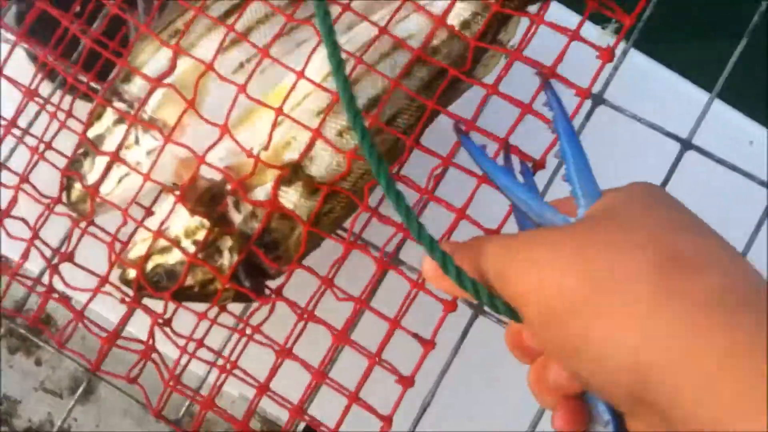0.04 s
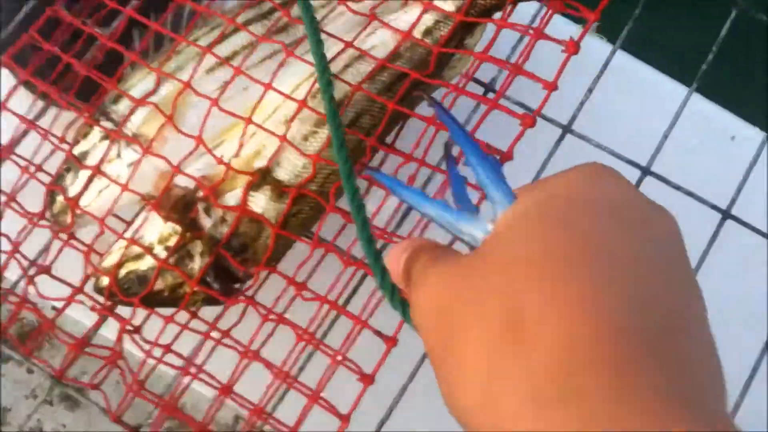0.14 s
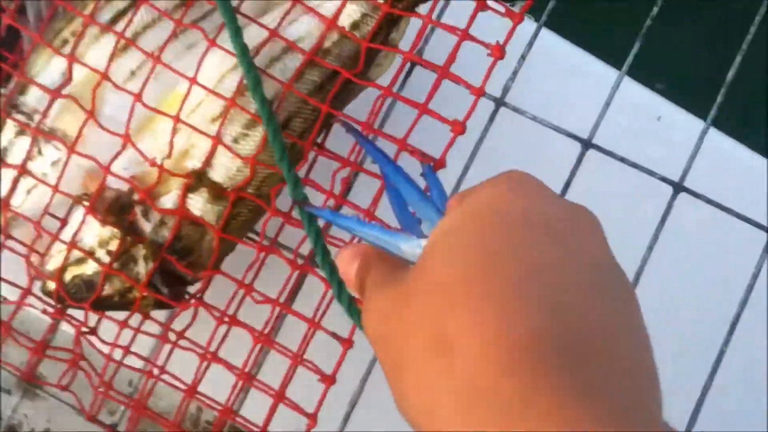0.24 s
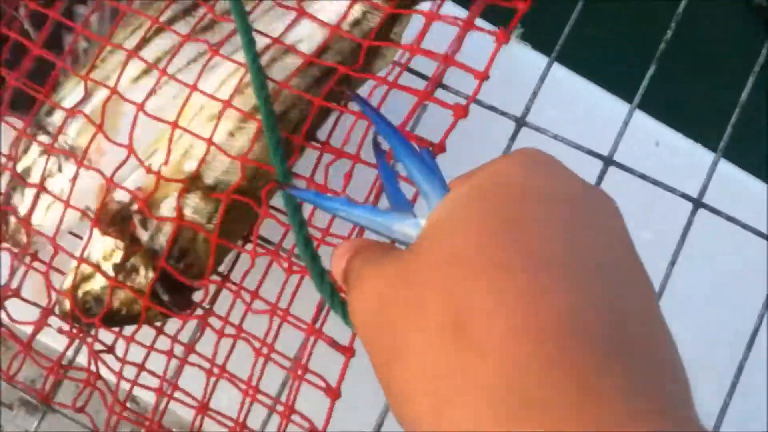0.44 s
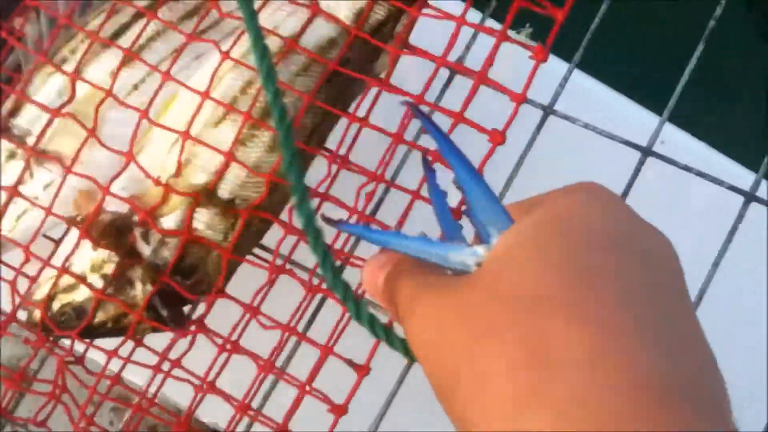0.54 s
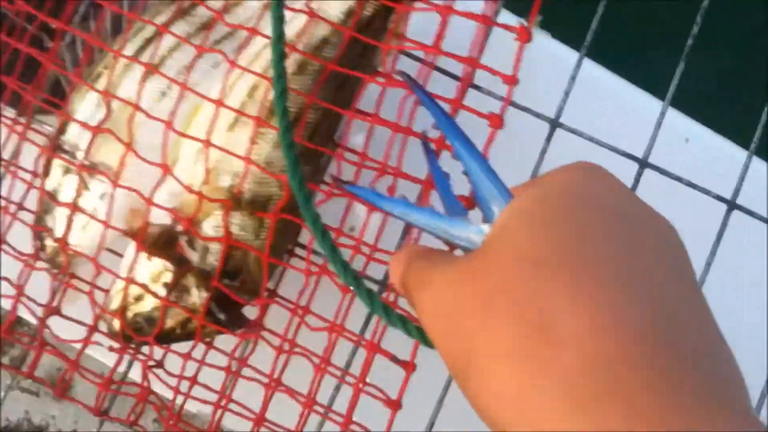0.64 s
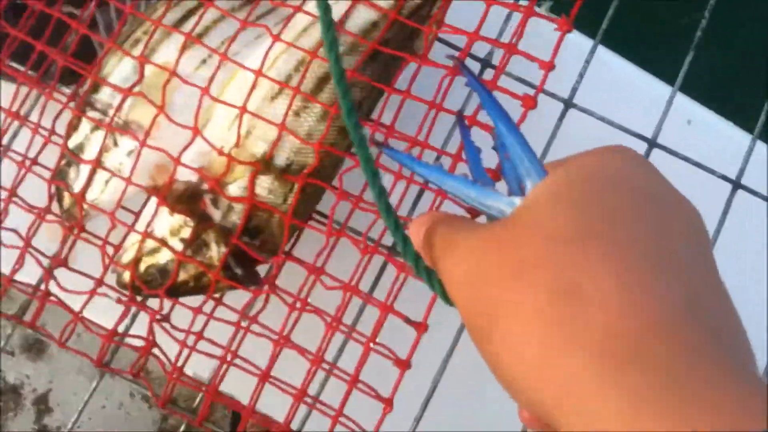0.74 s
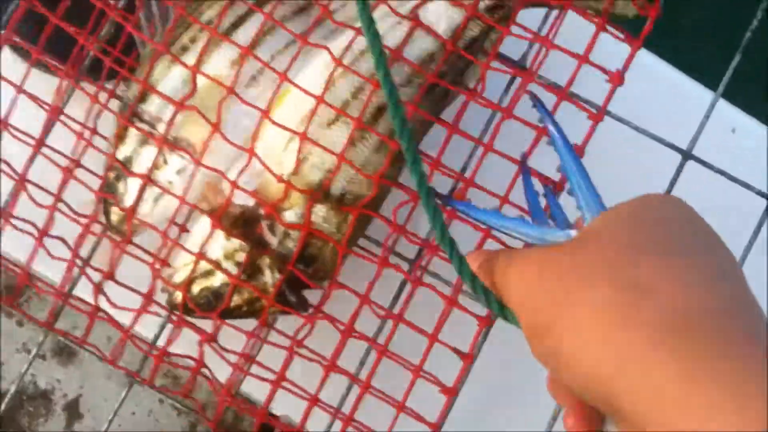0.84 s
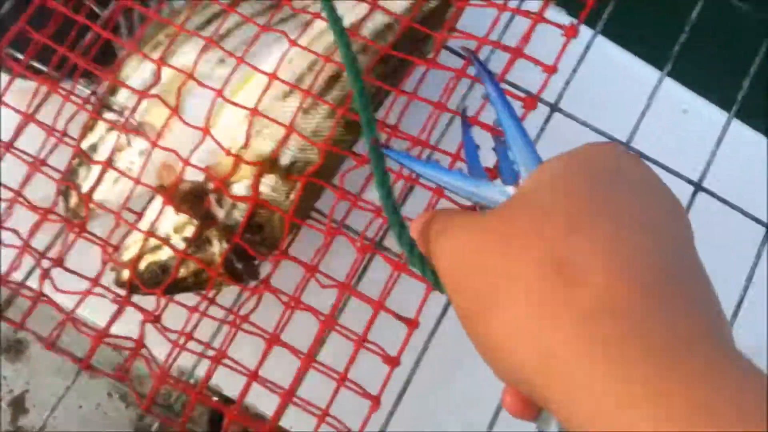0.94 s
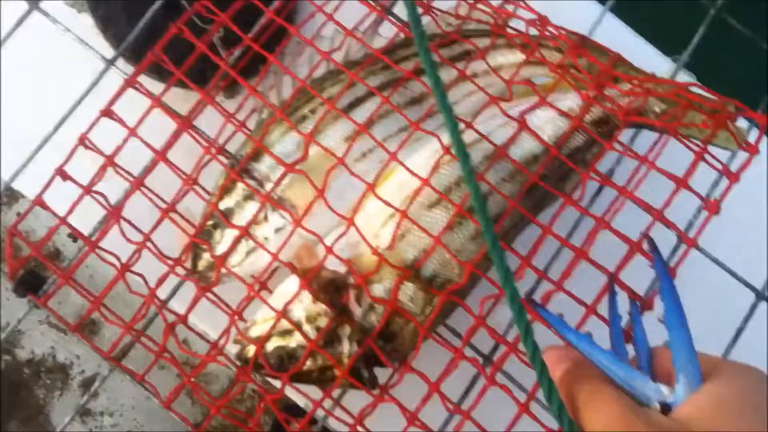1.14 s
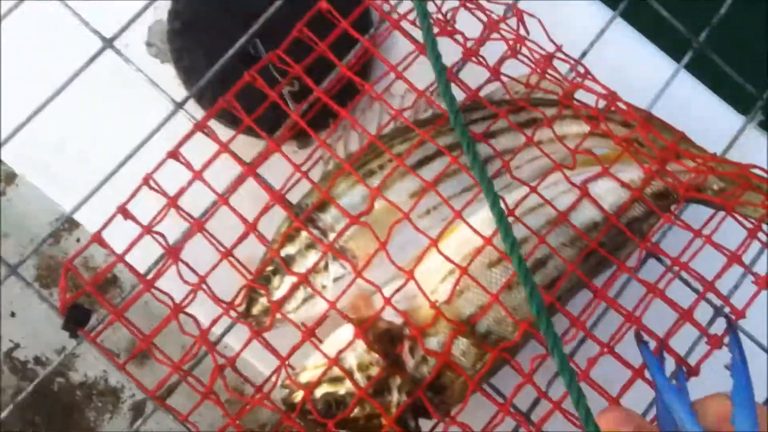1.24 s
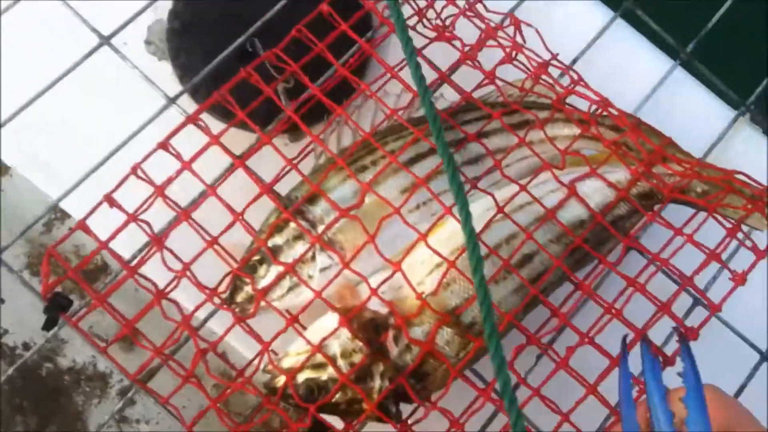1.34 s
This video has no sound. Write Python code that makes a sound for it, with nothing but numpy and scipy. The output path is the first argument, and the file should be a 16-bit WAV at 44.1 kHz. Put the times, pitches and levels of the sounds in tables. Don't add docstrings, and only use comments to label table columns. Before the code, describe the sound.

A crab trap's wires rattle under hard claw and shell knocks, quiet at first, then a dense bright burst, thinning into separate clacks. Hollow deck thumps and faint water wash sit below, heard close on a phone.

```python
import sys
import numpy as np
from scipy import signal
from scipy.fft import rfft, irfft
from scipy.io import wavfile
from scipy.ndimage import uniform_filter1d

SR = 44100
rng = np.random.default_rng(int(sys.argv[2]) if len(sys.argv) > 2 else 0)


def boost_factor(decibels):
    exponent = np.asarray(decibels, float) / 20
    return 10 ** exponent


def pcm_store(signal):
    levels = np.round(np.clip(np.atleast_2d(signal), -1, 1) * 32767)
    wavfile.write(sys.argv[1], SR, levels.astype(np.int16).T)


N = 61739
LENGTH = 12288


def unit(x):
    return x / np.max(np.abs(x))


def colour(x, points, tilt_db=0.):
    octave = np.log2(np.maximum(np.arange(1025) * SR / 2048, 20))
    p = np.array(points, float)
    db = np.interp(octave, np.log2(p[:, 0]), p[:, 1])
    db = db + tilt_db * (np.maximum(octave, np.log2(1300)) - np.log2(3500))
    cepstrum = irfft(db * np.log(10) / 20)
    cepstrum[1:1024] *= 2
    cepstrum[1025:] = 0
    response = irfft(np.exp(rfft(cepstrum)))
    return signal.fftconvolve(x, response)[:len(x)]


def above(x, hz):
    return signal.sosfiltfilt(signal.butter(6, hz, "high", fs=SR, output="sos"), x)


def ring(x, modes, chance, stretch=0.87):
    scatter_db, detune = 2, 0.016
    t = np.arange(LENGTH // 2) / SR
    response = np.zeros(len(t))
    for (hz, db, t60), a, b in zip(modes, chance[::2], chance[1::2]):
        decay = boost_factor(db + scatter_db * a - 60 * t / (t60 * stretch))
        response += decay * np.sin(2 * np.pi * hz * (1 + detune * b) * t)
    return signal.fftconvolve(x, response * np.linspace(1, 0, num=len(t)))[:LENGTH]


def add(out, s, x):
    i = int(round(s * SR))
    a, b = max(-i, 0), min(len(x), N - i)
    faded = x * np.minimum(np.linspace(3, 0, num=len(x)), 1)
    out[i + a:i + b] += faded[a:b]


def grains():
    grain_db, clump_db = 2.5, 1.6
    clumps = uniform_filter1d(np.repeat(rng.standard_normal(LENGTH // 128), 128), size=64)
    size_db = grain_db * rng.exponential(size=LENGTH) + clump_db * clumps
    return rng.standard_normal(LENGTH) * boost_factor(size_db)


def rattle(db, tilt_db, t60, hz, hold=0.):
    # hz, level_db
    frame_colour = [(240, -38.5), (360, -5), (620, -14.5), (1140, -10), (1710, -13), (1870, -5.5),
                    (5190, 1), (5600, -1.5), (16000, -24.5)]
    # pitch_hz, level_db, t60_s
    wire_modes = [(1413, -21.5, 0.2), (1907, -3, 0.082), (2105, -2.5, 0.051), (2830, -29, 0.13),
                  (3080, -11.5, 0.15), (3640, -31, 0.022), (3600, 1.5, 0.039), (4250, -7.5, 0.0056),
                  (4240, -11.5, 0.011), (5100, -3, 0.0072), (5980, -18, 0.033), (6630, 0, 0.0063)]
    strike_db, ring_db, patchy_db = 4.5, -9.5, 3.5
    t = np.arange(LENGTH) / SR
    attack_s = 0.00044 * boost_factor(-2.2 * min(db + 29, 0))
    late = np.maximum(t - hold, 0)
    shake = grains() * boost_factor(-60 * late / max(t60, .02))
    if hold == 0:
        shake = shake * (1 + boost_factor(strike_db) * np.exp(-t / 0.0018))
    shake = shake * np.minimum(t / attack_s, 1)
    shake = colour(shake, [(hz / 1.146, 0), (hz, 5), (hz * 1.255, 0)])

    dull = signal.sosfilt(signal.butter(2, 5150, fs=SR, output="sos"), shake)
    fade = boost_factor(-60 * t / .17)
    clatter = colour(fade * shake + (1 - fade) * dull, frame_colour, tilt_db)
    patches = np.c_[np.linspace(500, 16000, num=80), patchy_db * rng.standard_normal(80)]
    clatter = colour(clatter, patches)

    struck_modes = wire_modes + [(hz, -1.5, .045)]
    rung = ring(shake, struck_modes, rng.standard_normal(28))
    rung = colour(rung, [(400, 0.0073), (800, 0)], 0.56 * tilt_db)
    return boost_factor(db) * unit(unit(clatter) + boost_factor(ring_db) * unit(rung))


def wires():
    # start_s, peak_db, brightness_db_per_octave, rattle_t60_s, pitch_hz
    earlier_knock = (-.02, -26.5, -2.5, 0.24, 3021)
    # start_s, peak_db, brightness_db_per_octave, rattle_t60_s, pitch_hz
    knocks = [(.148, -38.5, -10.5, 0.4, 2570), (.195, -36.5, -27, 0.61, 904), (.222, -22, -7, 0.14, 3600),
              (.3586, -22, -4.5, 0.13, 3600), (.374, -20, -6, 0.15, 3510), (.4252, -16.5, 4, 0.11, 2970),
              (.4565, -9, -3, 0.13, 5190), (.5315, -27.5, -8, 0.14, 1770), (.565, -18, -3, .13, 3600),
              (.601, -19.5, -3.5, 0.32, 4210), (.632, -24, -7, 0.071, 5000),
              (.649, -23.5, -0.5, 0.095, 4820), (.672, -20, -8, 0.17, 2320),
              (.7317, -30.5, -8.5, 0.67, 4040), (.793, -23, -6, 0.13, 3740), (.885, -14, 2.5, 0.12, 3590),
              (.92, -23.5, -7.5, 0.31, 1516), (1.0445, -15, -3, 0.18, 3060),
              (1.046, -27.5, -12, 0.27, 1110), (1.134, -32, -0.5, 0.24, 3380),
              (1.2215, -30.5, -5, 0.34, 2864)]
    # start_s, peak_db, brightness_db_per_octave, pitch_hz, length_s
    drags = [
        (0.124, -42, -1, 4250, 0.069),
        (0.4252, -11.5, 0.6, 4620, 0.025),
        (0.89, -19, 0, 3830, 0.029),
    ]
    out = np.zeros(N)
    for s, db, tilt_db, t60, hz in [earlier_knock] + list(knocks):
        add(out, s, rattle(db, tilt_db, t60, hz))
    for s, db, tilt_db, hz, length in drags:
        add(out, s, rattle(db, tilt_db, 0.079, hz, length))
    return out


def single_wires():
    # start_s, peak_db, pitch_hz, t60_s
    lone_rings = [(0, -45.5, 1430, 0.19), (0.046, -48.5, 595, 0.24), (0, -40.5, 4100, 0.043),
                  (1.222, -39.5, 4550, 0.11), (.145, -49, 1260, 0.49), (.148, -44.5, 2400, .3),
                  (.148, -49, 3100, 0.23), (.146, -44, 3600, 0.31), (.15, -47, 4200, 0.28),
                  (.198, -40, 930, 0.13), (.4255, -21, 4100, 0.18), (.4255, -26, 2670, 0.31),
                  (.427, -22, 4400, 0.099), (.4555, -22.5, 3600, 0.1), (.455, -27.5, 1440, 0.18),
                  (0.4557, -22, 8000, 0.03), (.6, -38, 777, 0.47), (.566, -36.5, 1110, 0.11),
                  (.672, -35, 3000, 0.15), (1.045, -28.5, 1104, .12), (1.047, -38, 1880, 0.14),
                  (1.045, -29, 4100, 0.055), (1.047, -23, 2680, .12), (1.228, -44, 1300, 0.23)]
    # start_s, peak_db, brightness_db_per_octave, pitch_hz, length_s
    touches = [
        (.4525, -21, 2, 4470, 0.011),
        (1.0382, -30.5, -2, 3270, 0.0084),
    ]
    ring_cycles, swell_s = 90, .003
    out, t = np.zeros(N), np.arange(LENGTH) / SR
    for s, db, hz, t60 in lone_rings:
        shake = rng.standard_normal(LENGTH) * boost_factor(-60 * t / t60) * np.minimum(t / swell_s, 1)
        add(out, s, boost_factor(db) * unit(ring(shake, [(hz, 0, ring_cycles / hz)], np.zeros(2))))
    for s, db, tilt_db, hz, length in touches:
        add(out, s, rattle(db, tilt_db, 0.044, hz, length))
    return out


def water():
    # hz, level_db
    wash_colour = [(18, -79), (30, 1.5), (295, -2.5), (345, -5), (554, -3.5), (1430, -14.5), (1720, -13),
                   (3580, -11), (16000, -33.5)]
    # time_s, level_db
    swell_points = [(0, 1), (.3, 1), (.6, 9), (.9, -5.5), (1.2, 6.5), (1.3, -4.5), (1.4, -0.5)]
    wash_db, hiss_db, rumble_db = -59, -66.5, -51
    wash = colour(rng.standard_normal(N), wash_colour)
    waver = uniform_filter1d(np.repeat(rng.standard_normal(N // 2048 + 1), 2048), size=2048)[:N]
    hiss = above(rng.standard_normal(N), 4900)
    rumble = colour(rng.standard_normal(N), [(45, 7), (110, -23), (250, -58)])
    mix = boost_factor(wash_db + 1.4 * waver) * wash / wash.std()
    mix += boost_factor(hiss_db - 4 * np.arange(N) / N + 2.4 * waver[::-1]) * hiss
    mix += boost_factor(rumble_db) * rumble / rumble.std()
    return boost_factor(np.interp(np.arange(N) / SR, *np.array(swell_points).T)) * mix


def deck():
    # start_s, peak_db, share of the lower boards (0-1), t60 stretch (ratio)
    thumps = [(0.017, -45.5, 1, 0.37), (0.102, -53.5, 0.05, 1.1), (0.145, -48, 0, 1.3),
              (0.171, -35, 0.56, 3.7), (0.219, -34, 0.35, 0.93), (0.359, -35, 0.6, 3.4),
              (0.374, -24.5, 0.32, 1.3), (0.458, -23, 0.21, 0.84), (0.566, -32.5, 0, 2.8),
              (0.601, -24.5, 0.43, 2), (0.632, -27.5, 1, 1.4), (0.672, -24, 0.77, 1.9),
              (0.719, -32, 0, 0.74), (0.796, -26, 0.13, 0.67), (0.918, -27, 0.41, 2.06),
              (1.008, -44, 1, 0.8), (1.048, -25.5, 0.05, 1.8), (1.129, -41, 0.6, 5.4), (1.188, -42, 0, 6.6),
              (1.224, -38.5, 0.52, 5.3), (1.268, -50, 0.2, 0.65)]
    # pitch_hz, level_db, t60_s
    deck_modes = [(350.1, 21, 0.075), (376, 3, 0.13), (440, -26, 0.012), (1190, -25, 0.14),
                  (1862, 8.5, 0.07)]
    # pitch_hz, level_db, t60_s
    board_modes = [(154.5, -7, 1), (186.3, -7.5, 0.67), (242.2, 1, 0.59), (268, 4, 0.15), (330.8, 2, 0.16)]
    contact_s, jostle_db, jostle_t60_s = 0.0008, -6, 0.3
    out, t = np.zeros(N), np.arange(LENGTH) / SR
    for s, db, low, stretch in thumps:
        push = np.sin(np.pi * np.minimum(t / contact_s, 1))
        push += boost_factor(jostle_db - 60 * t / jostle_t60_s) * rng.standard_normal(LENGTH)
        chance = .5 * rng.standard_normal((2, 10))
        low, stretch = np.clip(low, 0, 1), max(stretch, .3)
        upper = unit(ring(push, deck_modes, chance[0], stretch))
        lower = unit(ring(push, board_modes, chance[1], stretch))
        add(out, s, boost_factor(db) * unit((1 - low) * upper + low * lower))
    return out


def ticks():
    # start_s, peak_db, pitch_hz, length_cycles
    tick_events = [(.0478, -34, 3000, 4.2), (.0478, -41, 6000, 5), (.06, -44, 3100, 3.5),
                   (.0757, -39, 3250, 4), (.0797, -40, 3050, 7), (.0992, -40, 3500, 4.5),
                   (.129, -44, 4200, 9), (.134, -44, 4200, 9), (.6115, -20, 3000, 1.2),
                   (.6176, -7.5, 3650, 3.1), (.777, -29, 2400, 2.5), (1.134, -33, 3300, 3),
                   (1.15, -38, 3400, 3.5), (1.2215, -30, 3350, 10), (1.2862, -44, 3900, 4),
                   (1.292, -47, 7000, 4), (1.2977, -41, 4900, 3), (1.301, -46, 2600, 4),
                   (1.3075, -48, 4800, 4), (1.3212, -42, 3460, 9), (1.3325, -50, 4700, 6)]
    out, t = np.zeros(N), np.arange(512) / SR
    for s, db, hz, cycles in tick_events:
        u = t * hz / cycles
        snap = rng.standard_normal(len(t)) * np.exp(-((u - .5) / 0.69) ** 2)
        tone = np.sin(2 * np.pi * hz * t) * np.exp(-((u - .6) / 0.5) ** 2)
        add(out, s - .0005, boost_factor(db) * unit(tone + boost_factor(-17 - 0.14 * db) * snap))
    return out


def scrapes():
    # start_s, length_s, level_db, centre_hz
    scrape_events = [(0.074, 0.058, -55, 12300), (0.167, 0.021, -54.5, 12100), (0.234, 0.019, -55, 12000),
                     (0.422, 0.034, -29, 9000), (0.452, 0.0096, -30.5, 8500), (0.531, 0.015, -33.5, 12000),
                     (0.607, 0.072, -45, 12500), (0.689, 0.011, -42, 14200), (0.739, 0.072, -50.5, 13200),
                     (0.881, 0.032, -40, 13300), (0.999, 0.02, -57.5, 10950), (1.028, 0.005, -46, 12000),
                     (1.037, 0.0029, -43, 6700), (1.064, 0.054, -60, 13000), (1.133, 0.0099, -54, 11100),
                     (1.231, 0.038, -56, 13200), (1.292, 0.0086, -64, 9000), (0.611, 0.0025, -28, 9000)]
    out, t = np.zeros(N), np.arange(LENGTH) / SR
    for s, length, db, hz in scrape_events:
        hiss = colour(grains(), [(hz / 5, -22), (hz / 2, -6), (hz, 0), (hz * 1.6, -3)])
        envelope = np.minimum(t / .002, 1) * np.exp(-(t / length) ** 1.4)
        add(out, s, boost_factor(db) * hiss / hiss.std() * envelope)
    return out


def scene():
    return (wires() + single_wires() + water() + deck() + ticks() + scrapes())[None]


def roll_off(x):
    return signal.sosfilt(signal.butter(12, 16820, fs=SR, output="sos"), x)


def record(dry):
    # start_s, length_s, above_hz
    dropouts = [(.158, .005, 4600), (.206, .013, 7000), (.266, .005, 4600), (.343, .013, 900),
                (.4135, .008, 2500), (.602, .007, 9000), (.876, .0065, 150), (.969, .005, 6500),
                (1.0485, .011, 7000), (1.182, .024, 6600), (1.372, .01, 4200)]
    # start_s, length_s, from_hz, to_hz
    holes = [(.154, .009, 650, 1000), (.154, .009, 1550, 1950), (.154, .009, 3050, 3350),
             (1.05, .016, 560, 970), (1.049, .011, 1350, 1680), (1.183, .035, 500, 780),
             (1.183, .021, 980, 1520), (1.183, .021, 2200, 3100), (1.183, .021, 4050, 4560),
             (1.183, .021, 4820, 5120), (1.183, .021, 5360, 5800), (1.183, .021, 6030, 6200),
             (1.36, .025, 1500, 2100), (.02, .025, 7500, 11500), (.052, .016, 7500, 10000),
             (1.309, .011, 5500, 11000)]
    dropout_db = -28
    x = signal.sosfilt(signal.butter(4, 120, "high", fs=SR, output="sos"), dry)
    x = x + boost_factor(-31.0) * dry
    x = signal.sosfilt(signal.ellip(8, .2, 40, 15900, fs=SR, output="sos"), x)
    t = np.arange(N) / SR
    for s, length, hz in dropouts:
        gap = np.clip(np.minimum(t - s, s + length - t) / .002 + .5, 0, 1)
        x = x - (1 - boost_factor(dropout_db)) * gap * above(x, hz)
    for s, length, low_hz, high_hz in holes:
        gap = np.clip(np.minimum(t - s, s + length - t) / .002 + 1.5, 0, 1)
        band = signal.cheby1(5, .1, [low_hz, high_hz], "band", fs=SR, output="sos")
        x = x - gap * signal.sosfiltfilt(band, x)
    return roll_off(x)


dry = scene()
out = record(dry)
pcm_store(out)
```